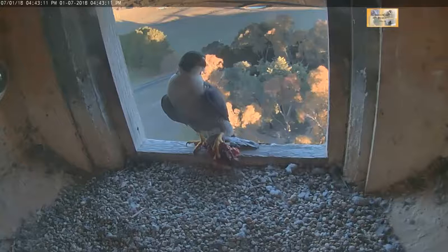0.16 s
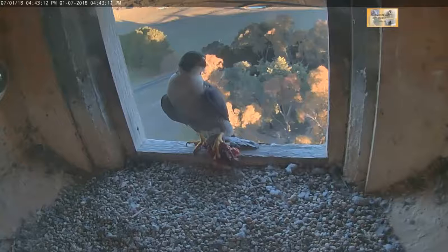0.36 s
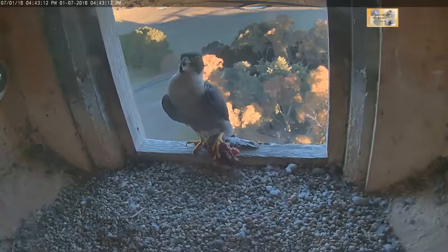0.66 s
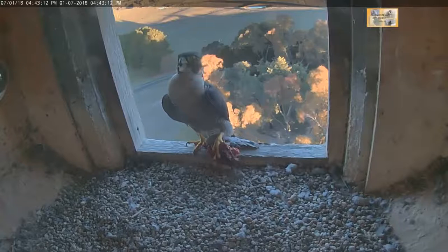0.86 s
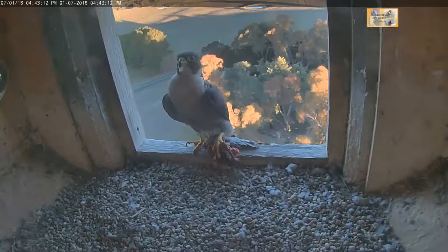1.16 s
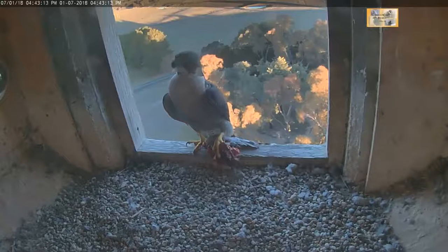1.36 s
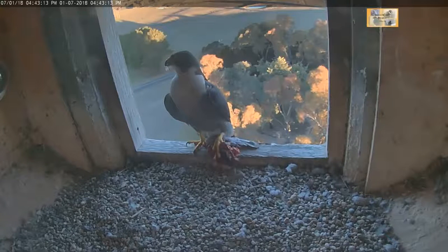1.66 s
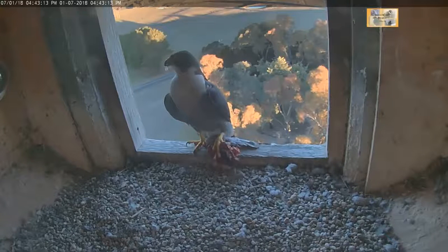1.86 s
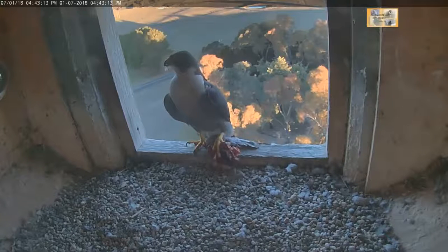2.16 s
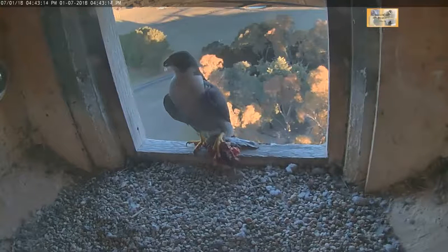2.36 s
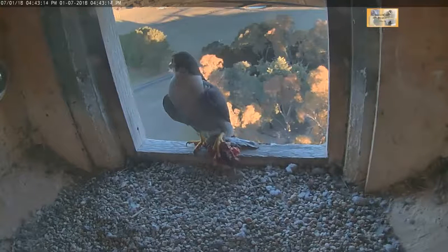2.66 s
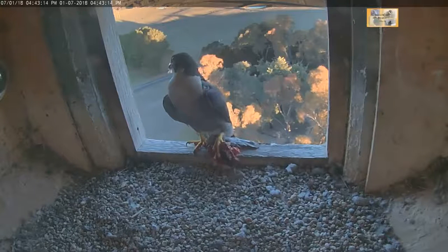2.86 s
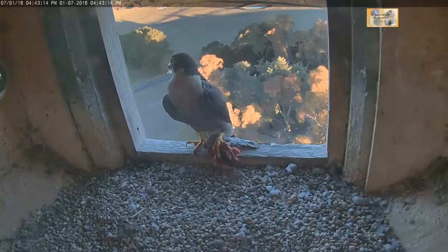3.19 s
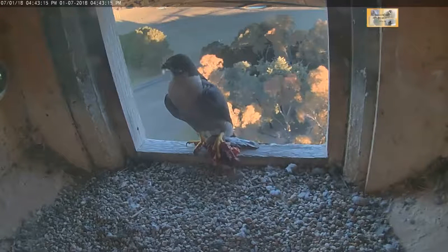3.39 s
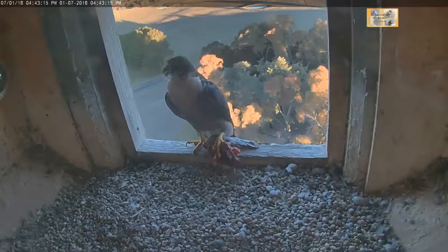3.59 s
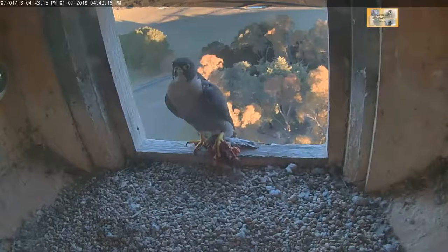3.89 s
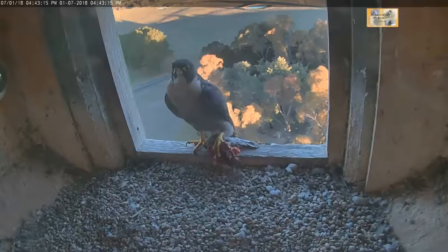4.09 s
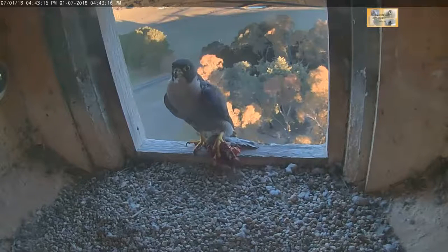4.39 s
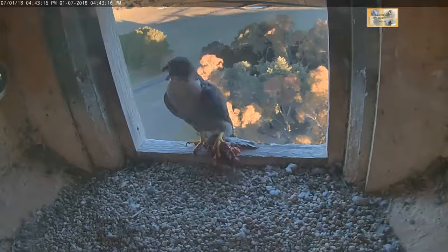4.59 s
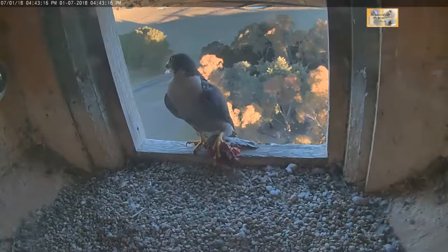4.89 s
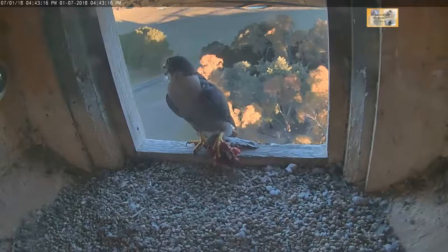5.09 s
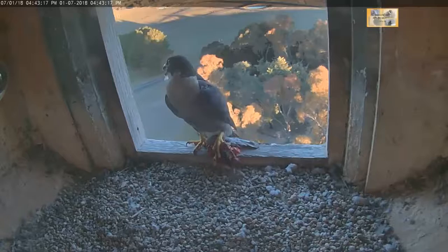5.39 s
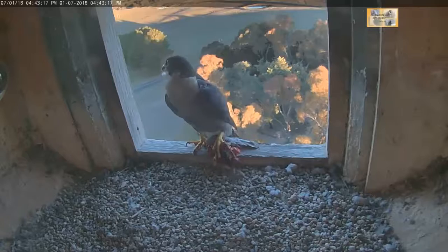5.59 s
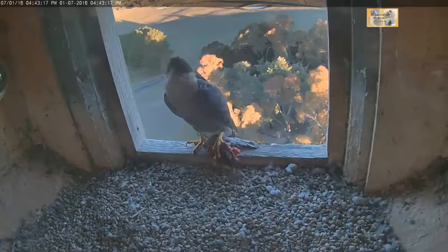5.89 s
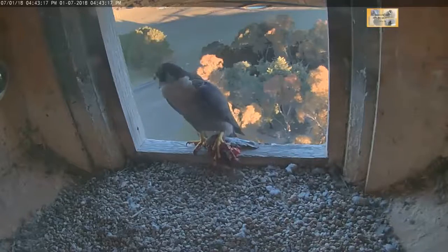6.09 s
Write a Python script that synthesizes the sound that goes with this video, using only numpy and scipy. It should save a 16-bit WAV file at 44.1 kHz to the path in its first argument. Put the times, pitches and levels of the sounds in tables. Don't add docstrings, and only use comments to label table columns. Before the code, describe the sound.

A cheap camera microphone inside a wooden nest box picks up low, uneven wind rumble, swelling and easing in gusts, beneath a steady hiss with a rough low throb and a barely audible whine. At 0 seconds the thin echo of an earlier call dies away within a second; then only wind and hiss until about 3.4. There a falcon, close by, gives a low rising cluck that snaps into a harsh chup with a soft thump. Squeak and falling raspy chup follow at 3.7-3.8, a stronger one at 4.05-4.2 with a heavy chest thump, another at 4.7-4.8. At 5.15 a higher, throaty cluck tips into a brief chup; at 5.57-5.68 a squeak cracks into a short chup and thump. From 6.0 a longer cluck breaks into thin, high squeaks to the end. Each call rings briefly in the box, leaving a faint wash.

```python
import sys
import numpy as np
from scipy import signal
from scipy.fft import rfft, irfft
from scipy.io import wavfile
from scipy.ndimage import uniform_filter1d, minimum_filter1d

SR = 44100
rng = np.random.default_rng(int(sys.argv[2]) if len(sys.argv) > 2 else 0)


def digitize_waveform(pressure):
    field = np.atleast_2d(pressure).T
    bounded = np.clip(field, -1, 1)
    quanta = np.round(bounded * 32767).astype(np.int16)
    wavfile.write(sys.argv[1], SR, quanta)


def field_ratio(decibels):
    return 10 ** (np.asarray(decibels, dtype=float) / 20)


N = 275625
T = np.arange(N) / SR

# start/s, length/s, time until the pitch turns upward/s, overtone level/dB, top pitch f/Hz
CLUCKS = [
    (3.392, 0.038, 0.019, -14.5, 578),
    (5.146, 0.052, 0.02, -14.5, 598),
    (6.005, 0.072, .016, -14, 565.3),
]
# f/Hz, width/Hz, level/dB
BOX = [(460, 150, -3), (1148, 123, -4), (1360, 96, 1), (1534, 200, -0.5), (2125, 216, -3.5),
       (2421, 110, 1.5), (2808, 102, 1), (2993, 77, 9.5), (3603, 83, 0.5), (4500, 630, -9.5),
       (5624, 81, -7), (6140, 89, -12), (6460, 720, -16)]


def unit(x):
    return x / np.sqrt(np.mean(x ** 2))


def ring(x, modes, spread=1.74):
    f = np.maximum(np.fft.rfftfreq(len(x), 1 / SR), 1)
    gain = 0
    for hz, width, db in modes:
        detune = (f ** 2 - hz ** 2) / (f * spread * width)
        gain = gain + field_ratio(db) / (1 + 1j * detune) ** 2
    return irfft(rfft(x) * gain, len(x))


def walk(rate):
    hold = max(int(SR / rate), 1)
    steps = np.repeat(rng.standard_normal(N // hold + 1), hold)
    return unit(uniform_filter1d(uniform_filter1d(steps, hold), hold)[:N])


def each_note(rows, fade_s=0.002):
    for start, length, *columns in rows:
        first = int((start - fade_s) * SR)
        span = slice(first, min(int((start + length + fade_s) * SR), N))
        t = T[span] - start
        gate = np.clip(np.minimum(t, length - t) / fade_s + 1, 0, 1) ** 2
        yield span, gate * np.sqrt(2), np.maximum(t, 0), np.clip(t / length, 0, 1), columns


def swell(t, gone, attack_s, hold, rise_db, fall_db):
    to_climb = np.clip(1 - t / attack_s, 0, 1)
    sunk = np.clip((gone - hold) / max(1 - hold, 0.05), 0, 1)
    return field_ratio(-rise_db * to_climb - fall_db * sunk)


def syrinx(hz, rough, span, wobble, shimmer):
    shaken_hz = hz * (1 + 0.14 * rough * wobble[span])
    return 2 * np.pi * np.cumsum(shaken_hz) / SR, 1 + 1.4 * rough * shimmer[span]


def wind():
    # f/Hz, density level/dB per Hz
    rumble = [(8, 8), (25, -4), (75, -11.5), (120, -21.5), (195, -6), (240, -13), (300, -26.5),
              (400, -38.5), (600, -46), (800, -70)]
    # t/s, level/dB
    gusts = [(0.0, -47.5), (0.45, -44), (0.9, -48.5), (1.4, -46), (2.15, -49), (2.9, -47), (3.4, -49),
             (3.8, -45), (4.4, -47.5), (5.2, -45), (5.7, -45), (6.1, -43), (6.25, -50)]
    hz, db = np.transpose(rumble)
    step = 16
    count = N // step + 1
    f = np.maximum(np.fft.rfftfreq(count, step / SR), 1)
    colour = field_ratio(np.interp(np.log(f), np.log(hz), db, right=-120))
    out = 0
    for centre_hz in 10 * 2 ** np.arange(0, 7, 0.5):
        window = np.clip(1 - np.abs(np.log2(f / centre_hz)) * 2, 0, 1) ** 0.5
        flicker = walk(9)[::step]
        lumpy = 35 < centre_hz < 100
        flicker_db = 3 + 14 * np.tanh(1.73 * flicker - 0.7) if lumpy else 3.07 * flicker
        band = irfft(rfft(rng.standard_normal(count)) * window * colour, count)
        out = out + field_ratio(flicker_db) * band
    gust_db = np.interp(T, *np.transpose(gusts))
    return unit(signal.resample_poly(out, step, 1)[:N]) * field_ratio(gust_db + 13)


def hiss():
    # f/Hz, width/Hz, level/dB
    circuit = [(1290, 220, -21), (2686, 160, -12.5), (2000, 2300, -11), (3500, 1100, -21), (5200, 190, -10),
               (4628, 60, 1), (5756, 316, 2.5), (5980, 170, 4), (6433, 540, 3), (6930, 420, -9.5)]
    turn = 2 * np.pi * 103.6 * T
    throb = 1 + 0.36 * np.cos(turn) + 0.2 * np.cos(2 * turn) + 0.1 * np.cos(5 * turn)
    noise = unit(ring(rng.standard_normal(N), circuit) * throb)
    whine = np.sin(2 * np.pi * 750 * T)
    return field_ratio(-52.5) * noise * field_ratio(walk(7.1)) + field_ratio(-77) * whine


def echoes(voice):
    t, grain = T[:SR], rng.standard_normal((3, SR))
    box_t60, walls_t60 = 0.054, 1.316
    fall = field_ratio(-60 * t / walls_t60) * (t < 0.9)
    near = ring(field_ratio(-21) * grain[0] * field_ratio(-60 * t / box_t60) * np.clip(t / 0.0019, 0, 1), BOX)
    thin = signal.lfilter([1, -0.9], [1], grain[1])
    far = ring(field_ratio(-36.5) * thin, BOX, spread=2.89) * fall * np.clip(t / 0.03, 0, 1)
    out = signal.fftconvolve(voice, near + far)[:N]
    earlier = ring(grain[2], [(1290, 300, -30), (2400, 200, -8), (4570, 250, 13), (6640, 400, -16)])
    out[:SR] += field_ratio(-60) * unit(earlier) * fall
    return out


def thumps():
    # t/s, peak level/dB, f/Hz, t60/s
    drops_of_chest = [(3.39, -21.5, 146, 0.028), (3.698, -26.5, 163.3, 0.11), (3.808, -15, 197, 0.027),
                      (4.057, -20.5, 153, 0.062), (4.201, -8.5, 206.4, 0.097), (4.677, -21.5, 146, 0.034),
                      (4.782, -15, 205, 0.05), (5.142, -19.5, 159, 0.065), (5.56, -20.5, 160, 0.029),
                      (5.675, -10.5, 228, 0.038), (6.007, -29, 143, 0.089)]
    rise_s, sag_s = 0.002, 0.01
    gulp_s, gulp_hz, gulp_db = 0.018, 637, -24.5
    out, t = np.zeros(N + SR), T[:SR // 4]
    gulp = t[:int(gulp_s * SR)] / gulp_s
    for s, db, hz, t60 in drops_of_chest:
        phase = 2 * np.pi * hz * (0.95 * t + 0.15 * sag_s * (1 - np.exp(-t / sag_s)))
        envelope = (1 - np.exp(-t / rise_s)) * field_ratio(-60 * t / max(t60, 0.01))
        start = int(s * SR)
        out[start:start + len(t)] += field_ratio(db + 2.5) * envelope * np.sin(phase)
        if hz > 180:
            gulp_phase = 2 * np.pi * np.cumsum(gulp_hz + (1.3 * hz - gulp_hz) * gulp) / SR
            out[start - len(gulp):start] += field_ratio(db + gulp_db) * np.sin(np.pi * gulp) * np.sin(gulp_phase)
    return out[:N]


def rasps():
    # start/s, length/s, throat level/dB, mouth level/dB, beak level/dB
    breaths = [(3.393, 0.061, -14.5, -27.5, -35), (3.436, 0.036, -46, -38.5, -28),
               (3.697, 0.037, -35.5, -49, -30.5), (3.749, 0.036, -29.5, -30.5, -14.5),
               (3.772, 0.039, -16, -19.5, -39), (4.068, 0.079, -35, -40, -31.5),
               (4.147, 0.038, -28.5, -26.5, -23.5), (4.174, 0.057, -20.5, -27, -40),
               (4.676, 0.024, -35, -41, -35), (4.735, 0.039, -26.5, -22, -20),
               (4.758, 0.043, -24.5, -26, -40.5), (5.146, 0.066, -4.5, -23, -32),
               (5.203, 0.022, -29.5, -42, -25), (5.566, 0.065, -42, -42, -34.5),
               (5.634, 0.031, -34, -32.5, -16), (5.648, 0.047, -15, -22.5, -38),
               (6.006, 0.068, -16, -27, -29.5), (6.075, 0.08, -39, -41, -41), (6.172, 0.037, -54, -44, -38),
               (6.242, 0.037, -33, -33, -33)]
    slaps = (rng.random(N) < 900 / SR) * field_ratio(3.9 * rng.standard_normal(N))
    air = unit(slaps - slaps.mean()) + 0.67 * rng.standard_normal(N)
    throat = unit(ring(air, [(1214.3, 71, 4.5), (1444.5, 128, -6.0)]))
    mouth = unit(ring(air, [(2386, 280, -9), (2783, 54, 3.5), (3028, 150, -6.5)]))
    beak = unit(ring(air, [(3660, 330, -7.5), (4410, 370, -2.5), (5744, 350, 0.5), (6615, 260, 1.5)]))
    for span, gate, *_ in each_note(CLUCKS):
        throat[span] *= 1 - 0.45 * gate
    out = np.zeros(N)
    for span, gate, t, gone, (throat_db, mouth_db, beak_db) in each_note(breaths, fade_s=0.003):
        breath = field_ratio(throat_db - 8) * swell(t, gone, 0.0098, 0.66, 20, 32) * throat[span]
        breath += field_ratio(mouth_db - 3.5) * swell(t, gone, 0.0063, 0.36, 26, 52) * mouth[span]
        breath += field_ratio(beak_db - 6) * swell(t, gone, 0.0047, 0.86, 20, 18) * beak[span]
        out[span] += gate * breath
    return out


def squeaks():
    # start/s, length/s, level/dB, start f/Hz, end f/Hz
    lower = [(3.699, 0.04, -31, 3440, 4120), (4.079, 0.084, -28.5, 3750, 4636),
             (4.677, 0.037, -32.5, 3866, 4475), (5.204, 0.011, -27.5, 3834, 3650),
             (5.215, 0.036, -36.5, 3664, 3680), (5.567, 0.045, -35.5, 3370, 3960),
             (5.608, 0.0093, -30, 4090, 4150), (5.619, 0.019, -36, 4220, 4230),
             (5.642, 0.015, -24, 3535, 3340), (6.068, .026, -32, 3930, 3760),
             (6.095, 0.015, -23.5, 3740, 3524), (6.12, 0.028, -47, 3390, 2980),
             (6.156, .016, -27.5, 3800, 3960), (6.172, 0.027, -38, 4100, 4220)]
    # start/s, length/s, level/dB, start f/Hz, end f/Hz
    second = [(3.721, 0.034, -30.5, 5680, 6450), (3.757, 0.029, -29.5, 5900, 6060),
              (4.078, 0.022, -30, 2262, 2447), (4.697, 0.019, -33.5, 6050, 6070),
              (4.714, 0.03, -40.5, 6280, 6600), (5.617, 0.029, -25, 5790, 5820),
              (5.64, .024, -35.5, 5860, 5725), (6.179, .056, -31, 5800, 6480),
              (6.243, 0.024, -36.5, 6400, 6080)]
    fade_db_s = 406
    out, wobble, shimmer = np.zeros(N), walk(700), walk(250)
    for span, gate, t, gone, (db, start_hz, end_hz) in each_note(lower):
        rising = end_hz > start_hz
        glide = 1 - (1 - gone) ** 3.1 if rising else gone
        hz = start_hz + (end_hz - start_hz) * glide
        phase, size = syrinx(hz, 0.25, span, 0.12 * wobble, shimmer)
        octave = field_ratio(-4 - fade_db_s * t if rising else 1)
        companion = field_ratio(-19.5 - fade_db_s * t) * rising
        tone = np.sin(phase) + octave * np.sin(2 * phase) + companion * np.sin(0.55 * phase)
        out[span] += gate * size * field_ratio(db + 4) * swell(t, gone, 0.0052, 0.71, 12, 14) * tone
    for span, gate, t, gone, (db, start_hz, end_hz) in each_note(second):
        hz = start_hz + (end_hz - start_hz) * gone
        phase, size = syrinx(hz, 0.28, span, 0.1 * wobble, shimmer)
        out[span] += gate * size * field_ratio(db + 5.5) * swell(t, gone, 0.0091, 0.52, 11, 13) * np.sin(phase)
    return out


def chups():
    # start/s, length/s, fundamental level/dB, overtone level/dB, start f/Hz
    falls = [(3.443, 0.022, -19.5, -25.5, 2624), (3.76, 0.036, -25, -22.5, 2591),
             (4.149, .04, -20, -16.5, 2738), (4.74, 0.042, -24.5, -23, 2852),
             (5.216, 0.025, -27, -31.5, 2526), (5.646, 0.014, -27, -34.5, 2540)]
    # t/s, start f/Hz, end f/Hz, length/s, level/dB
    tears = [
        (3.751, 6400, 3500, 0.012, -18),
        (4.144, 5570, 4620, 0.0026, -19.5),
        (4.736, 6470, 3680, 0.0084, -20.5),
        (5.631, 3910, 3400, 0.005, -21),
    ]
    rest_hz, sag_s = 2173, 0.011
    out, wobble, shimmer = np.zeros(N), walk(900), walk(350)
    for span, gate, t, gone, (db, over_db, start_hz) in each_note(falls):
        hz = rest_hz + (start_hz - rest_hz) * np.exp(-t / sag_s)
        phase, size = syrinx(hz, 0.16, span, 0.22 * wobble, shimmer)
        base = np.sin(phase) + field_ratio(-21) * np.sin(phase / 2)
        stack = field_ratio(db) * swell(t, gone, 0.0049, 0.41, 9.7, 26) * base
        stack += field_ratio(over_db) * swell(t, gone, 0.0071, 0.31, 15, 21) * np.sin(2 * phase)
        stack += field_ratio(over_db - 2.5) * swell(t, gone, 0.015, 0.32, 21, 21) * np.sin(3 * phase)
        out[span] += field_ratio(6) * gate * size * stack
    tear_notes = [(s, length, db, top, end) for s, top, end, length, db in tears]
    for span, gate, t, gone, (db, top_hz, end_hz) in each_note(tear_notes):
        hz = top_hz + (end_hz - top_hz) * gone
        phase, size = syrinx(hz, 0.52, span, 0.48 * wobble, shimmer)
        out[span] += gate * size * field_ratio(db - 3.9 * gone) * np.sin(phase)
    return out


def clucks():
    # multiple of the pitch, level/dB
    overtones = [(2, -5), (3, -4), (4, -17), (5, -24), (6, -18), (7, -18.5), (8, -19.5), (9, -30.5)]
    start_pitch_hz, rise_s = 429.4, 0.0068
    low, high, wobble, shimmer = np.zeros(N), np.zeros(N), walk(300), walk(200)
    for span, gate, t, gone, (turn_s, high_db, top_hz) in each_note(CLUCKS):
        hz = start_pitch_hz + (top_hz - start_pitch_hz) / (1 + np.exp((turn_s - t) / rise_s))
        phase, size = syrinx(hz, 0.14, span, 0.25 * wobble, shimmer)
        low[span] += gate * field_ratio(-22.5) * swell(t, gone, 0.0084, 0.5, 20, 22) * np.sin(phase)
        stack = sum(field_ratio(db) * np.sin(k * phase + 0.6 * k * k) for k, db in overtones)
        high[span] += gate * size * field_ratio(high_db + 7) * swell(t, gone, 0.028, 0.61, 11.7, 45) * stack
    return low + ring(high, BOX, spread=1.5)


def scene():
    shrill = chups() + squeaks()
    voice = clucks() + shrill + rasps()
    push = -0.7 * uniform_filter1d(uniform_filter1d(shrill ** 2, size=60), size=60)
    close = voice + push
    room = 0.32
    close = np.where(close > 0, room * np.tanh(close / room), close)
    return (close + thumps() + echoes(voice) + wind() + hiss())[None]


def top_cut(x):
    return signal.sosfilt(signal.butter(12, 15720, fs=SR, output="sos"), x)


def record(dry):
    # f/Hz, width/Hz
    housing = [(840, 333), (1900, 93)]
    top_hz, offset = 7973, 0.555
    x = dry
    for hz, width in housing:
        x = 0.3 * x + 0.76 * signal.lfilter(*signal.iirnotch(hz, hz / width, SR), x)
    x = signal.sosfilt(signal.cheby2(10, 60, 1.0574 * top_hz, fs=SR, output="sos"), x)
    spare = minimum_filter1d(0.4 / np.maximum(x, 0.4), size=161)
    x = x * uniform_filter1d(uniform_filter1d(spare, size=80), size=80) + offset
    x = x + field_ratio(-81) * signal.lfilter([1, -0.8], [1], rng.standard_normal(x.shape))
    return top_cut(x)


dry = scene()
out = record(dry)
digitize_waveform(out)
```